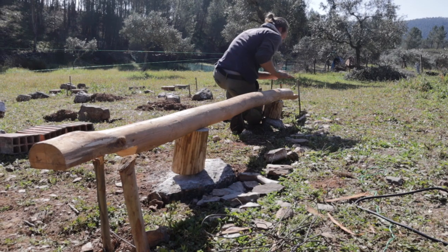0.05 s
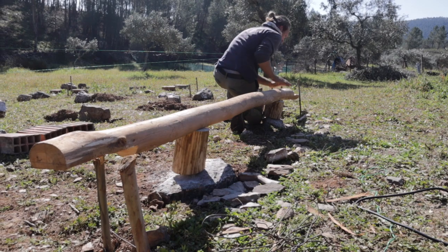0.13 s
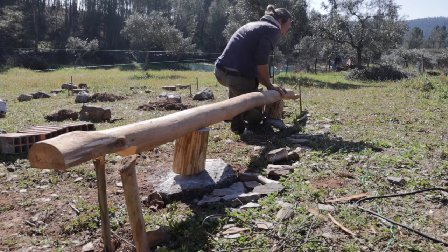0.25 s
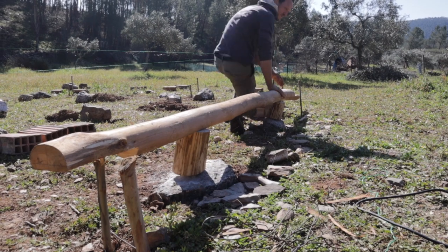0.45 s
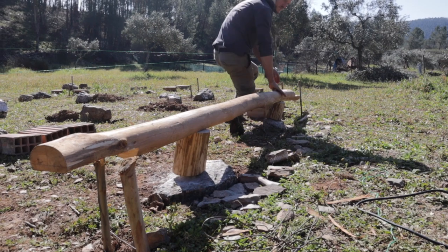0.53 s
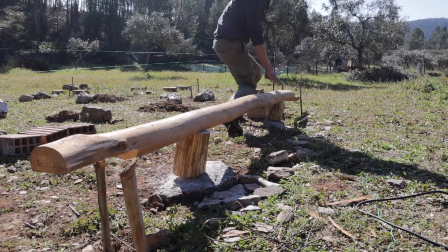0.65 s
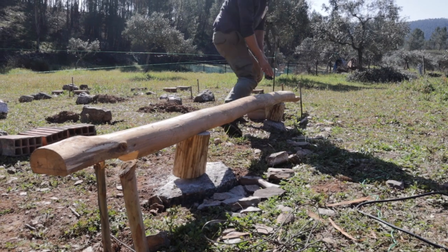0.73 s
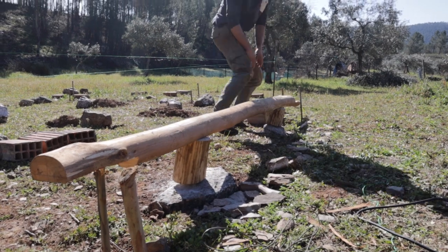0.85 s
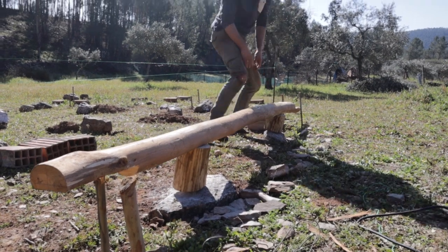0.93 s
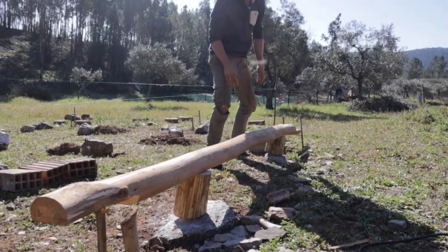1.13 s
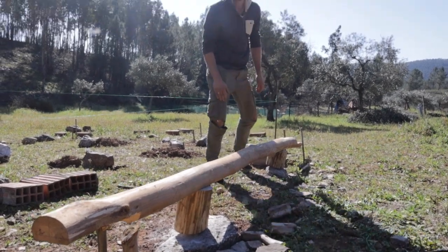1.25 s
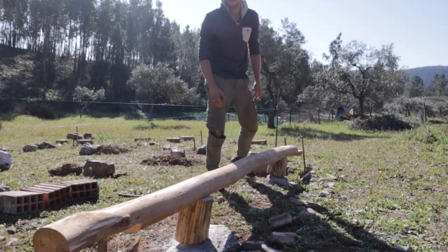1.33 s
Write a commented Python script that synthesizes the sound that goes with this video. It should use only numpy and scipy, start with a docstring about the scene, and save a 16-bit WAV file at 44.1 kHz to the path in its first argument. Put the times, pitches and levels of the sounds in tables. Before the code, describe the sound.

A wooden log knocks hard onto a post outdoors, then faint footsteps move away.

```python
"""An open field: a long debarked log is dropped into its seat on a wooden post.
Wood rasps and groans on wood, then five quick contacts crack and ring the log as one hard knock.
Someone stands up and steps away: boots click on stones and twigs, brush dry grass, thud on soil.
Faint steady hiss and a little wind on the microphone lie underneath."""
import sys
import numpy as np
from scipy import signal
from scipy.fft import rfft, irfft, next_fast_len
from scipy.io import wavfile
from scipy.ndimage import map_coordinates

SR = 44100
rng = np.random.default_rng(int(sys.argv[2]) if len(sys.argv) > 2 else 0)


def store_wav(level_fs):
    """Save 16-bit WAV to argv[1]."""
    pcm = np.round(np.clip(np.atleast_2d(level_fs), -1, 1) * 32767)
    wavfile.write(sys.argv[1], SR, pcm.T.astype(np.int16))


N = 61739


def amp(db):
    """dB to gain."""
    return 10 ** (np.asarray(db) / 20)


def unit(x):
    """Scale to rms 1."""
    return x / np.sqrt(np.mean(x ** 2) + 1e-20)


def clock():
    """Sample times in s."""
    return np.arange(N) / SR


def along(points, hz):
    """Interpolate (f/Hz, value) points over log frequency."""
    f, values = np.transpose(points)
    return np.interp(np.log(hz + 1), np.log(f + 1), values)


def filtered(x, response):
    """Apply the gain response(hz) by FFT."""
    size = next_fast_len(N + SR // 2)
    return irfft(rfft(x, size) * response(np.fft.rfftfreq(size, 1 / SR)), size)[:N]


def noise(spectrum):
    """Noise of rms 1, shaped by (f/Hz, density/dB) points."""
    return unit(filtered(rng.standard_normal(N), lambda hz: amp(along(spectrum, hz))))


def grainy(depth_db, rate_hz):
    """White noise in small random bursts."""
    knots = rng.standard_normal(N)
    flicker_db = depth_db * map_coordinates(knots, [clock() * rate_hz], order=1)
    return rng.standard_normal(N) * amp(flicker_db)


def fade(t, t60_s):
    """Exponential decay, 60 dB per t60_s."""
    return np.exp(-np.log(1000) * np.maximum(t, 0) / t60_s)


def burst(start_s, rise_s, t60_s):
    """Envelope: quadratic rise, exponential decay."""
    t = clock() - start_s
    return np.clip(t / rise_s, 0, 1) ** 2 * fade(t - rise_s, t60_s)


# Hiss and wind spectra: f/Hz, density/dB
HISS_SPECTRUM = [(29, -34), (50, -8.5), (85, -4), (284, -7.5), (345, -8), (461, -10.5), (559, -9.5),
                 (661, -10), (1700, -15.5), (14900, -24), (16000, -27)]
WIND_SPECTRUM = [(5, -7), (15, -0.5), (30, -6), (60, -18), (200, -39.5), (1000, -74)]
# Hiss and wind envelopes: t/s, level/dB
HISS_LEVEL = [(0, -60), (.6, -58.5), (1.4, -57.5)]
WIND_LEVEL = [(0, -67), (.42, -60), (.6, -64.5), (.8, -58), (1.2, -60), (1.35, -55)]

def field_air():
    """Steady outdoor hiss; light wind rumbles on the microphone."""
    envelope = lambda rows: amp(np.interp(clock(), *np.transpose(rows)))
    return envelope(HISS_LEVEL) * noise(HISS_SPECTRUM) + envelope(WIND_LEVEL) * noise(WIND_SPECTRUM)


# Sliding friction: f/Hz, density/dB
RASP_SPECTRUM = [(60, -11.5), (160, 3), (420, 4.5), (950, -10.5), (1200, 6.5), (1450, -12), (3200, -8.5),
                 (4100, -16), (5000, -10), (6800, -25.5), (9000, -23), (16000, -31.5)]
# Stick-slip tone: t/s, f/Hz, level/dB
GROAN_TRACK = [(.201, 560, -51), (.206, 531, -33.5), (0.21, 443, -24.5), (0.219, 394, -29),
               (0.222, 303, -35.5), (0.234, 302, -41)]

def log_slide():
    """Wood rasps on wood entering the seat; stick-slip adds a short falling groan."""
    grains = grainy(depth_db=-1, rate_hz=1500)
    rasp = unit(filtered(grains, lambda hz: amp(along(RASP_SPECTRUM, hz))))
    times_s, pitch_hz, db = np.transpose(GROAN_TRACK)
    phase = 2 * np.pi * np.cumsum(np.interp(clock(), times_s, pitch_hz, left=0)) / SR
    groan = np.sin(phase) * np.interp(clock(), times_s, amp(db), left=0, right=0)
    return amp(-22) * rasp * burst(start_s=0.2015, rise_s=0.01, t60_s=0.043) + groan


# Dense wood resonances: f/Hz, density/dB
BODY_SPECTRUM = [(20, -50), (60, -28), (150, -2), (450, -2.5), (800, -2), (1100, -6.5), (1600, -3),
                 (2100, -11), (3000, -11.5), (5500, -22.5), (9000, -22), (16000, -39)]
# Their decay: f/Hz, t60/s
BODY_DECAY = [(100, 0.076), (800, 0.15), (1700, 0.11), (3000, 0.094), (8000, 0.097), (16000, .045)]

def wood_body(start_s):
    """Dense resonances after a blow, as decaying noise; the mids last longest."""
    hz, t, bins = signal.stft(noise(BODY_SPECTRUM), SR, nperseg=128)
    decay = fade(t, along(BODY_DECAY, hz)[:, None])
    tail = signal.istft(bins * decay, SR, nperseg=128)[1]
    return np.pad(tail, (int(start_s * SR), 0))[:N]


# Modes of the seated log: f/Hz, relative level/dB, t60/s, swell/s
LOG_MODES = [(101.4, -22, 0.16, 0.0011), (164, -9.95696, 0.074, 0.0027), (232.779, -9.5, 0.06, 0.00557446),
             (313.5, -1.8, 0.17, 0.015), (374, -8.5, 0.15, 0.00033), (404, -24, 0.066, 0.0024),
             (509, -17.503, 0.119701, 0.000827117), (622, -9.5, 0.074, 0.00025), (700, -10.5, 0.1, 0.0096),
             (787.6, 3, 0.086, 0.026), (841.7, -2, 0.12, 0.013), (1000, -7, 0.045, 0.000081),
             (1204, 5.5, 0.035, 0.00074), (1308, -1, 0.062, 0.0013), (1535, -1.5, 0.033, 0.00082),
             (1754.99, 1.5, 0.041, 0.00029), (1900, 0, 0.028, 0.00084), (2640, -9.0, 0.028, 0.00047),
             (3290, -7, 0.02, 0.00066), (5600, -4, 0.0087, 0.0005)]

def log_ring(start_s, scatter_db):
    """Struck modes swell and decay, alternating in sign; levels scatter per blow."""
    t = np.maximum(clock() - start_s, 0)
    out = np.zeros(N)
    for k, (hz, db, t60_s, swell_s) in enumerate(LOG_MODES):
        gain = (-1) ** k * amp(db + rng.normal(0, scatter_db))
        envelope = (1 - np.exp(-t / swell_s)) * fade(t, t60_s)
        out += gain * envelope * np.sin(2 * np.pi * hz * t)
    return out


# Log-post contacts: t/s, ring gain/dB, crack level/dB, ring cutoff/Hz, crack rise/s, crack t60/s
LOG_CONTACTS = [(0.2061, -25, -30.5, 716, .0008, 0.017), (0.2149, -33.5, -25, 1900, 0.00096, 0.0062),
                (.23062, -17.5, -42, 750, .001, 0.018), (0.2321, -19, -16.5, 8800, 0.0025, 0.013),
                (0.2418, -29.5, -41.5, 530, 0.0022, 0.036)]
# Contact noise: f/Hz, density/dB
CRACK_SPECTRUM = [(20, -44), (80, -25), (200, -8), (600, -2.5), (1700, -1.5), (2300, -4), (3300, -6),
                  (4800, -8), (5600, -4.5), (6800, -16.5), (8300, -11), (10500, -23), (12700, -19.5),
                  (16000, -29)]

def log_knock():
    """Each contact cracks and rings the log; a softer one reaches fewer high modes."""
    out = np.zeros(N)
    for start_s, ring_db, crack_db, cutoff_hz, rise_s, t60_s in LOG_CONTACTS:
        ring = log_ring(start_s, scatter_db=0.1) + amp(-11) * wood_body(start_s)
        out += amp(ring_db) * filtered(ring, lambda hz: 1 / (1 + 1j * hz / cutoff_hz))
        out += amp(crack_db) * noise(CRACK_SPECTRUM) * burst(start_s, rise_s, t60_s)
    return out


# Stones and twigs: t/s, peak level/dB, f/Hz, rise/cycles
STONE_TICKS = [(.374, -47.5, 278, 0.97), (.489, -49.5, 1690, 0.85), (0.5656, -44, 990, 0.55),
               (0.8003, -34.5, 390, .3), (.8011, -42.5, 1400, 0.81), (0.8019, -42, 2410, 0.92),
               (1.0432, -44, 1710, .8), (1.05, -39, 840, 0.76), (1.06, -35.5, 2000, 0.71),
               (1.0592, -39, 3800, 0.83), (1.0808, -28, 1200, 0.28), (1.0855, -41.5, 1700, .8),
               (1.093, -30.5, 310, 0.41), (1.209, -41, 760, .9)]

def stone_ticks():
    """Stones and twigs click under the boots, a few cycles each."""
    out = np.zeros(N)
    for start_s, db, hz, rise_cycles in STONE_TICKS:
        t = np.maximum(clock() - start_s, 0)
        age = t * hz / rise_cycles
        out += amp(db) * np.sin(2 * np.pi * hz * t) * (age * np.exp(1 - age)) ** 2
    return out


# Sole strokes: peak t/s, rise/s, fall/s, level/dB, centre f/Hz
SOLE_SCUFFS = [(.39, 0.01, .03, -56, 234), (0.399, 0.013, 0.042, -61, 1070),
               (.65, 0.038, 0.059, -64.5, 1480), (.775, 0.055, 0.062, -55, 640),
               (.82, 0.04, .045, -55, 170), (.97, 0.087, .05, -59.5, 148), (1.05, 0.011, .018, -50, 1300),
               (1.05, 0.011, .02, -53, 230), (1.086, 0.0071, 0.0089, -52.5, 1300),
               (1.15, 0.082, 0.073, -62, 282), (1.24, 0.012, 0.024, -57, 1280)]

def sole_scuffs(relative_width=0.68, cutoff_hz=4000):
    """Soles brush dry grass and soil: swells of band-passed grit."""
    out = np.zeros(N)
    for peak_s, rise_s, fall_s, db, centre_hz in SOLE_SCUFFS:
        t = clock() - peak_s
        band = lambda hz: 1j * hz * centre_hz / (
            centre_hz ** 2 - hz ** 2 + 1j * hz * centre_hz * relative_width)
        grains = grainy(depth_db=2.5, rate_hz=700)
        grit = unit(filtered(grains, lambda hz: band(hz) / (1 + 1j * hz / cutoff_hz)))
        envelope = np.exp(-(t / np.where(t < 0, rise_s, fall_s)) ** 2)
        out += amp(db) * grit * envelope
    return out


# Heel strikes: peak t/s, half length/s, level/dB, f/Hz
HEEL_THUDS = [(0.986, 0.011, -48.5, 90), (1.014, 0.0087, -45.5, 85)]

def heel_thuds():
    """Heels land on soft ground: low Gaussian tone pulses."""
    out = np.zeros(N)
    for peak_s, half_s, db, hz in HEEL_THUDS:
        t = clock() - peak_s
        out += amp(db) * np.cos(2 * np.pi * hz * t) * np.exp(-(t / half_s) ** 2)
    return out


def scene():
    """Log, steps and air in the open; mono, no reflections."""
    log = log_slide() + log_knock()
    steps = stone_ticks() + sole_scuffs() + heel_thuds()
    return (log + steps + field_air())[None]


TOP_HZ = 15900

def record(dry):
    """Brick-wall low-pass."""
    return filtered(dry[0], lambda hz: hz < TOP_HZ)[None]


dry = scene()
out = record(dry)
store_wav(out)
```